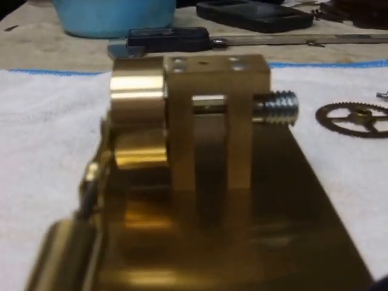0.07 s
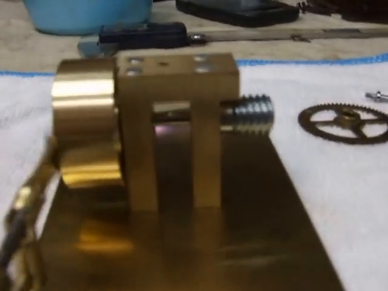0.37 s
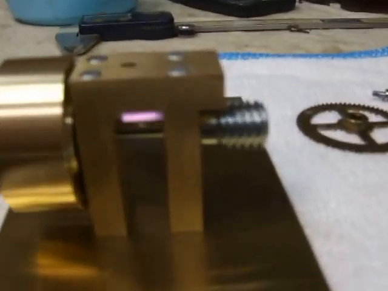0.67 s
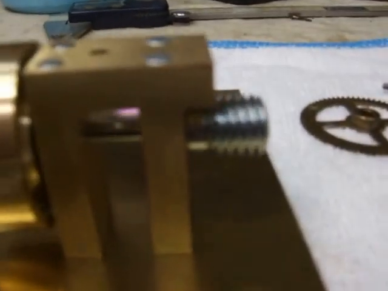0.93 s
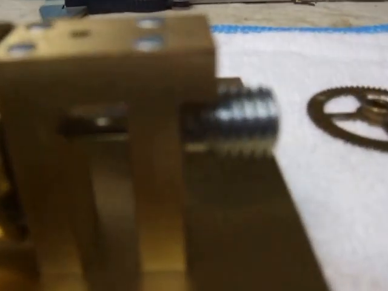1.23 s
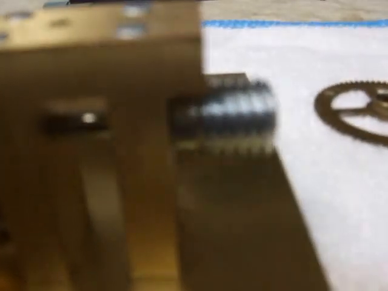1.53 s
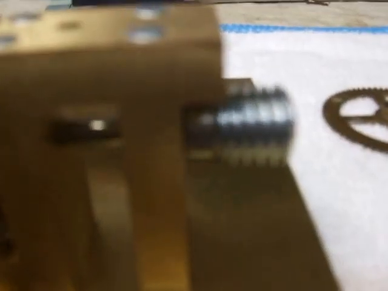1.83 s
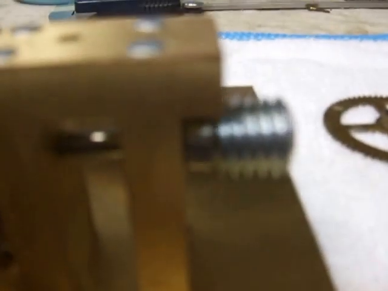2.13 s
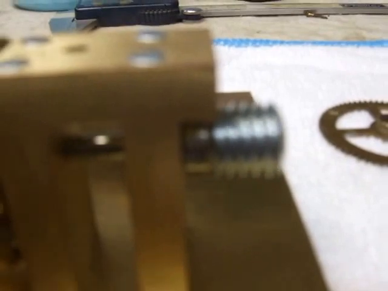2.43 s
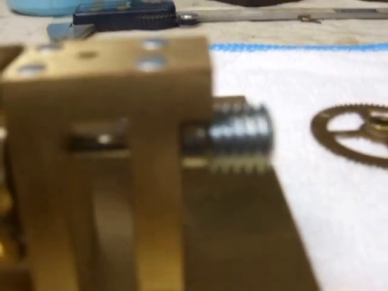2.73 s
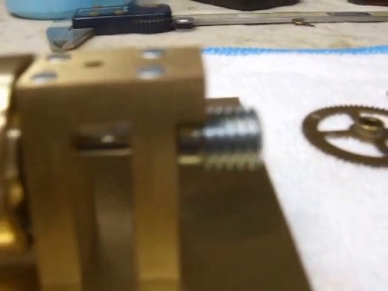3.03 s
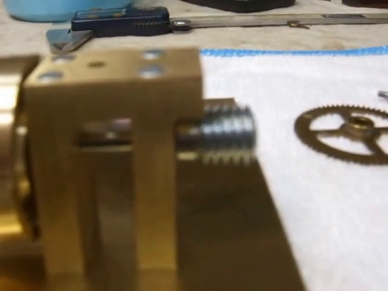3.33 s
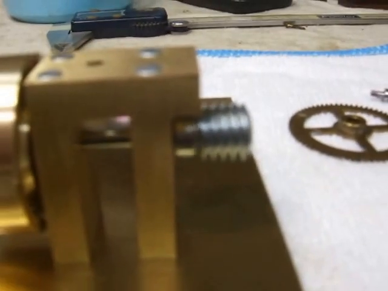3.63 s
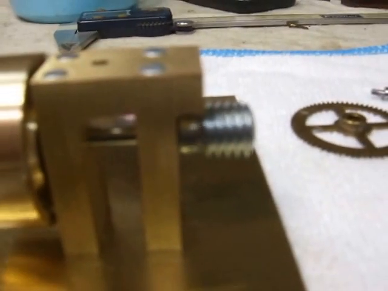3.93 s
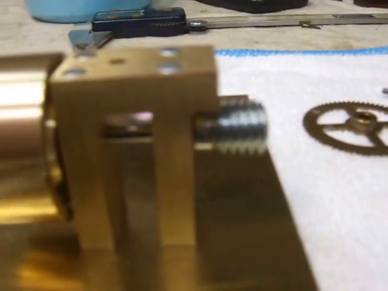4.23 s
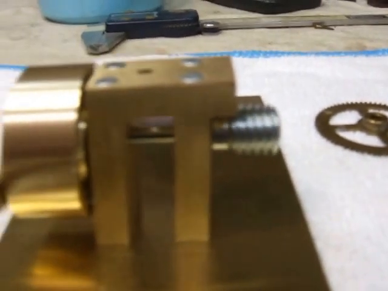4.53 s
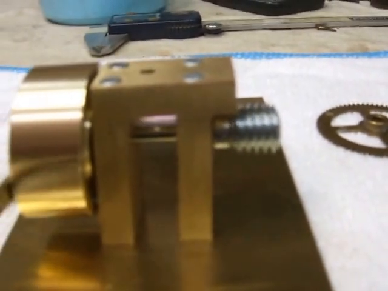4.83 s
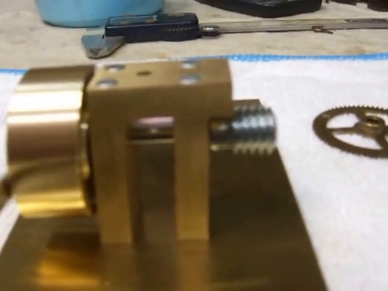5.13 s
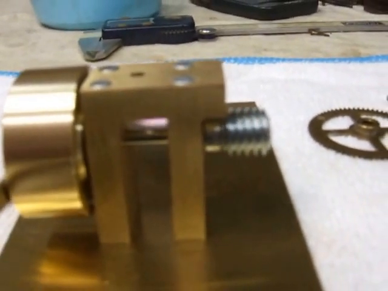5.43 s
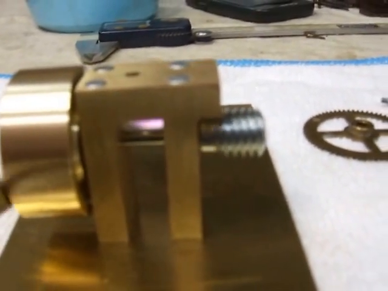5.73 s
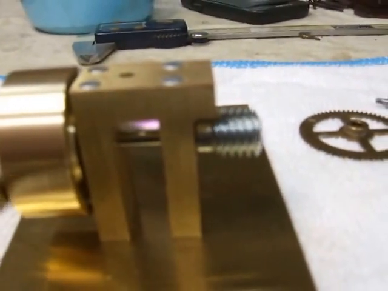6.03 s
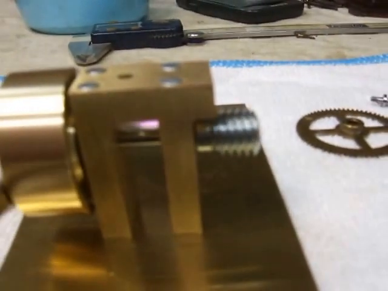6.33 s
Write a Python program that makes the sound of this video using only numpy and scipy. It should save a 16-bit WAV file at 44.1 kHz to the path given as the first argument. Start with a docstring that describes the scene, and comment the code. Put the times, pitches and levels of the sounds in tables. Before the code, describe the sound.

Rapid, even metallic clacking comes from a little brass engine driven by compressed air, running throughout. Each knock has a short rattling rebound, with occasional light clinks, soft puffs and a pulsing hiss of leaking air. Later the engine briefly slows twice, letting out more air, and recovers. It is heard from a close, slowly moving microphone in a fairly dry workshop with a faint rumble and hum.

```python
"""Small brass engine on compressed air, about 7 turns/s, heard close from a moving mic.
At both dead centres the slack rod knocks, then rebounds in a short chatter, ringing the brass
parts and the base plate. The port puffs softly and air leaks past the piston on every stroke.
Underneath: bearing rub, faint reflections, workshop rumble and hum."""
import sys
import numpy as np
from scipy import signal
from scipy.fft import rfft, irfft
from scipy.io import wavfile
from scipy.ndimage import uniform_filter1d

SR = 44100
rng = np.random.default_rng(int(sys.argv[2]) if len(sys.argv) > 2 else 0)


def log_audio(samples):
    """Write samples as a 16-bit WAV file to the path given in sys.argv[1]."""
    # one column per channel
    frames = np.atleast_2d(samples).T
    # limit to full scale, then quantise
    limited = np.clip(frames, -1, 1)
    pcm = np.round(limited * 32767).astype(np.int16)
    wavfile.write(sys.argv[1], SR, pcm)


N = 286209
TIME_S = np.arange(N) / SR
AGE_S = np.arange(SR // 8) / SR  # since a contact

# workshop rumble spectrum: f/Hz, level/dB
RUMBLE_SPECTRUM = [(15, 9.5), (35, -8), (60, -3.5), (90, -2), (140, -7), (250, -6), (500, -18.5),
                   (1500, -39)]
# shaft rubbing in its bearings: f/Hz, level/dB
RUB_SPECTRUM = [(50, -7), (110, 7), (250, -2.5), (420, -3), (850, 2), (1400, -1.5), (2400, -2.5),
                (5000, -17)]
# leaking air: f/Hz, level/dB
LEAK_SPECTRUM = [(300, -16), (900, -18), (2300, -13.5), (3400, -4), (4800, -3.5), (5800, -2.5), (6800, 2.5),
                 (7500, 3.5), (8300, -7)]
# mic path: t/s, nearness (0 back by the flywheel, 1 over the bearing block)
MIC_PATH = [(0, 0.6), (.5, 0.62), (1.2, 1), (2.4, 0.98), (3.2, 0.47), (4.2, 0.58), (4.8, 0.03),
            (6.49, 0.29)]
# cylinder beams treble at the mic at first: t/s, treble re middle/dB
TREBLE_BEAM = [(0, 4.5), (.5, 5), (1.3, 0.5)]
# flywheel speed, sagging twice as much air escapes: t/s, speed/(turns/s)
FLYWHEEL_SPEED = [(0.0, 6.208), (0.39, 6.805), (0.59, 6.602), (0.72, 7.0), (1.06, 6.725), (1.91, 7.28),
                  (2.13, 6.881), (2.55, 6.803), (2.91, 7.064), (3.03, 6.745), (3.18, 6.963), (4.4, 7.113),
                  (4.64, 6.675), (4.77, 5.86), (5.21, 6.84), (5.97, 7.016), (6.09, 6.384), (6.48, 6.924)]
# extra air past the port face: stroke end t/s, boost/dB
BLOW_BY_STROKES = [(1.155, 4.5), (2.295, 7), (4.589, 5), (4.744, 10), (5.94, 2.5), (6.087, 11)]
# cloth-damped base plate and block: f/Hz, level/dB (before 1/t60 weight), t60/s, near gain/dB
PLATE_MODES = [(569.5, -9, 0.044, 0), (822, -5.5, 0.017, 0), (926, -4.5, 0.021, -3.5),
               (1093, -6, 0.0096, -5.5), (1393.6, 5, 0.045, -2.5), (1805, -6, 0.032, 2.5),
               (2002, -6, 0.04, -5), (2507, -5, 0.071, -5.5)]
# rod, cylinder, flywheel: f/Hz, level/dB (before 1/t60 weight), t60/s, near gain/dB
BRASS_MODES = [(3055.5, -9, 0.045, 5), (3582, -18, .022, 2.5), (3781, -10, 0.049, 1),
               (4103, -11, 0.028, -3), (4630, 0, 0.072, -4.5), (4774, 1.5, .035, -17),
               (4920, -11.5, 0.019, 3.5), (5516, -20.5, 0.023, 8.5), (5640, -15, 0.014, 6),
               (5896, -6, 0.023, -11), (6420, -9.5, 0.053, -7), (7035, -1.5, 0.016, -7.5),
               (7604, 1.5, 0.023, -4.5)]
# dense, fast-dying plate vibration: f/Hz, level/dB
PLATE_CRACK_SPECTRUM = [(100, -9.5), (420, -20), (800, 5), (1200, 3), (2200, -15.5), (3500, -19.5)]
# dense, fast-dying brass vibration: f/Hz, level/dB
BRASS_CRACK_SPECTRUM = [(1500, -18), (2400, -13), (3200, -10.5), (4500, -4), (6000, -0.5), (7500, -4),
                        (8300, 12.5), (16000, -14.5)]
# square rebounds: t/s, f/Hz (picks the two nearest brass modes), level/dB
SQUARE_REBOUNDS = [(0.129, 5950, -26), (.272, 5950, -29.5), (.499, 5950, -30.5), (1.378, 5600, -28),
                   (2.809, 5580, -30), (3.525, 4580, -26.5), (3.673, 4736, -29.5), (5.146, 4736, -26.5),
                   (6.321, 4736, -29)]
# harder head-end knocks: t/s, boost/dB
HARD_HEAD_KNOCKS = [(.116, 1.5), (.27, 3.5), (.567, 1), (.715, 1), (1.155, 3.5), (1.3, 1.5), (2.588, 1.5),
                    (3.019, 4), (3.593, 2), (3.738, 1.8), (4.022, 3.5)]

START_TURNS, HEAD_END_TURNS, CRANK_END_TURNS = 0.2707, 0, 0.4635  # crank angles
KNOCK_FADE_DB_PER_S, REBOUND_FADE_DB_PER_S = -0.167, -0.3954
LEAK_FADE_DB_PER_S, PUFF_FADE_DB_PER_S = -1.14, -0.29
KNOCK_SCATTER_DB, REBOUND_SCATTER_DB, LEAK_SCATTER_DB = 1.0, 1.74, 0.6
PLATE_FAR_DB, PLATE_NEAR_GAIN_DB = -12.5, 5  # re brass


def undb(db):
    """dB to gain."""
    return 10 ** (np.asarray(db) / 20)


def unit(x, span_s=None):
    """Scale to rms 1, overall or over the opening span."""
    return x / np.sqrt(np.mean(x[:int(span_s * SR) if span_s else None] ** 2) + 1e-18)


def bin_gains(spectrum, size):
    """Gain per FFT bin, interpolated over log frequency."""
    hz, db = np.transpose(spectrum)
    bin_hz = np.fft.rfftfreq(size, 1 / SR)
    return undb(np.interp(np.log(bin_hz + 1), np.log(hz), db))


def noise(spectrum):
    """Steady coloured noise, rms 1."""
    return unit(irfft(rfft(rng.standard_normal(N)) * bin_gains(spectrum, N), N))


def nearness(t_s):
    """Mic nearness to the bearing block, 0-1."""
    return np.interp(t_s, *np.transpose(MIC_PATH))


def dead_centres(angle_turns):
    """Times/s at which the crank passes an angle."""
    speed = np.interp(TIME_S, *np.transpose(FLYWHEEL_SPEED))
    turns = START_TURNS + np.cumsum(speed) / SR - angle_turns
    return TIME_S[1:][np.diff(np.floor(turns)) > 0]


def boosts_db(times_s, table):
    """Boost per stroke; each row goes to the nearest stroke."""
    out = np.zeros(len(times_s))
    for t_s, db in table:
        out[np.argmin(np.abs(times_s - t_s))] += db
    return out


def add(out, t_s, sound):
    """Mix a sound in at t_s."""
    start = max(int(t_s * SR), 0)
    out[start:start + len(sound)] += sound[:max(N - start, 0)]


def workshop(hum_hz=89.4):
    """Low rumble, faint steady hum."""
    rumble = noise(RUMBLE_SPECTRUM)
    hum = unit(np.sin(2 * np.pi * (hum_hz * TIME_S + rng.random())))
    return undb(-49.5) * rumble + undb(-58.5) * hum


def reflections(x, wet_db, t60_s):
    """Direct sound plus a faint tail off bench and workshop."""
    t_s = np.arange(SR // 2) / SR
    tail = rng.standard_normal(len(t_s)) * np.exp(-np.log(1000) * t_s / t60_s) * (t_s > 0.004)
    return x + undb(wet_db) * signal.fftconvolve(x, tail / np.linalg.norm(tail))[:N]


def cylinder_beam(x, split_hz):
    """Treble up, middle down while the cylinder faces the mic."""
    treble = signal.sosfiltfilt(signal.butter(4, split_hz, "high", fs=SR, output="sos"), x)
    lift = undb(np.interp(TIME_S, *np.transpose(TREBLE_BEAM)) / 2)
    return treble * lift + (x - treble) / lift


def bearing_rub():
    """Shaft rub, louder near the block."""
    return undb(-51.0 + 9.2 * nearness(TIME_S)) * noise(RUB_SPECTRUM)


def piston_leak(head_db, crank_db, near_gain_db, sag_db, empty_share):
    """Hiss sags as the cylinder empties, swells as pressure returns, most towards the crank end."""
    head_s = dead_centres(HEAD_END_TURNS)
    ends_s = np.sort(np.concatenate([head_s, dead_centres(CRANK_END_TURNS)]))
    peak_db = np.where(np.isin(ends_s, head_s), head_db, crank_db)
    peak_db += LEAK_FADE_DB_PER_S * ends_s + near_gain_db * nearness(ends_s)
    peak_db += boosts_db(ends_s, BLOW_BY_STROKES) + LEAK_SCATTER_DB * rng.standard_normal(len(ends_s))
    hold_edges_s = np.ravel([ends_s - 0.025, ends_s + 0.011], order="F")
    held_db = np.interp(TIME_S, hold_edges_s, np.repeat(peak_db, 2))
    stroke_share = np.interp(TIME_S, ends_s, np.arange(len(ends_s))) % 1
    emptied = np.interp(stroke_share, [0, empty_share, 1], [0, 1, 0])
    return undb(held_db + sag_db * emptied) * noise(LEAK_SPECTRUM)


def port_puff(t_s, base_db, delay_s, width_s):
    """Port opens: pressure dips, swings up, settles."""
    jitter_s, scatter_db = rng.normal(0, [0.00044, 0.72])
    widths = (AGE_S - delay_s - jitter_s) / width_s
    level_db = base_db + PUFF_FADE_DB_PER_S * t_s + 3.8 * nearness(t_s) + scatter_db
    return undb(level_db) * np.exp(-widths ** 2 / 2) * np.sin(1.425 * widths + 0.7)


def ring(modes, near, scatter_db, detune):
    """Decaying modes; level and pitch shift slightly with the contact point."""
    hz, db, t60_s, near_gain_db = np.transpose(modes)[:, :, None]
    size, shift, phase = rng.standard_normal((3, len(modes), 1))
    waves = np.cos(2 * np.pi * hz * (1 + detune * shift) * AGE_S + phase)
    decay = np.exp(-np.log(1000) * AGE_S / t60_s)
    gain = undb(db + near * near_gain_db + scatter_db * size) / t60_s
    return np.sum(gain * waves * decay, axis=0)


def clinks():
    """A square rebound rings a close pair of brass modes."""
    out = np.zeros(N)
    for t_s, hz, db in SQUARE_REBOUNDS:
        pair = sorted(BRASS_MODES, key=lambda mode: abs(mode[0] - hz))[:2]
        ringing = ring(pair, nearness(t_s), scatter_db=0.5, detune=0.001)
        add(out, t_s, undb(db) * unit(ringing, span_s=0.029))
    return out


def crack(spectrum, size=512):
    """Dense, fast-dying vibration: minimum-phase pulse by folded cepstrum."""
    cepstrum = irfft(np.log(bin_gains(spectrum, size)))
    cepstrum[1:size // 2] *= 2
    cepstrum[size // 2 + 1:] = 0
    pulse = irfft(np.exp(rfft(cepstrum)))
    return np.pad(pulse, (0, len(AGE_S) - size))


def struck_part(force, modes, crack_spectrum, near, crack_db, detune):
    """Force drives a part's modes and crack; rms 1 over the attack."""
    ringing = ring(modes, near, scatter_db=1.52, detune=detune)
    response = unit(ringing) + undb(crack_db) * unit(crack(crack_spectrum))
    return unit(signal.fftconvolve(force, response)[:len(AGE_S)], span_s=0.009)


def contact(blow_db, rise_s, fall_s, spread_db):
    """Force of loose metal meeting: one blow, then a dying chatter of uneven micro-impacts."""
    impacts, size = rng.standard_normal((2, len(AGE_S)))
    envelope = (1 - np.exp(-AGE_S / rise_s)) * np.exp(-(AGE_S / fall_s) ** 1.16)
    chatter = impacts * undb(spread_db * size) * envelope
    blow = rng.standard_normal(len(AGE_S)) * np.exp(-AGE_S / 0.00035)
    return unit(chatter) + undb(blow_db) * unit(blow)


def whiten(force, span_hz):
    """Flatten a force's broad colour, so the parts clack alike on every turn."""
    size = 2 * len(force)
    spectrum = rfft(force, size)
    power = uniform_filter1d(np.abs(spectrum) ** 2, int(span_hz * size / SR))
    return irfft(spectrum / np.sqrt(np.abs(power) + 1e-18))[:len(force)]


def clack(t_s, force, brass_db, plate_rel_db):
    """One contact rings the bright brass and the duller plate."""
    force, near = whiten(force, span_hz=295), nearness(t_s)
    brass = struck_part(force, BRASS_MODES, BRASS_CRACK_SPECTRUM, near, crack_db=-10.5, detune=0.0019)
    plate = struck_part(force, PLATE_MODES, PLATE_CRACK_SPECTRUM, near, crack_db=-5, detune=0.0042)
    return undb(brass_db) * (brass + undb(plate_rel_db) * plate)


def pin_tick(db, hz, rise_s):
    """Pin meets bearing: a bright tick, a few cycles long."""
    envelope = (AGE_S / rise_s) ** 2 * np.exp(2 * (1 - AGE_S / rise_s))
    pitch_hz = hz * rng.normal(1, 0.038)
    return undb(db) * envelope * np.sin(2 * np.pi * (pitch_hz * AGE_S + rng.random()))


def strokes(times_s, knock_base_db, rebound_base_db):
    """Fading, scattered rod impacts: t/s, knock/dB, rebound/dB, plate re brass/dB."""
    knock, rebound = rng.standard_normal((len(times_s), 2)).T
    knock_db = knock_base_db + KNOCK_FADE_DB_PER_S * times_s + KNOCK_SCATTER_DB * knock
    rebound_db = rebound_base_db + REBOUND_FADE_DB_PER_S * times_s + REBOUND_SCATTER_DB * rebound
    plate_rel_db = PLATE_FAR_DB + PLATE_NEAR_GAIN_DB * nearness(times_s)
    return np.transpose([times_s, knock_db, rebound_db, plate_rel_db])


def crank_end_knocks(plate_trim_db=-1.33):
    """Short scraping knock, gap as the rod crosses its slack, stronger rebound; one puff."""
    out = np.zeros(N)
    rows = strokes(dead_centres(CRANK_END_TURNS), knock_base_db=-23.0, rebound_base_db=-21.0)
    for t_s, knock_db, rebound_db, plate_rel_db in rows:
        knock = contact(blow_db=-6, rise_s=0.0006, fall_s=0.0033, spread_db=5)
        add(out, t_s, clack(t_s, knock, knock_db, plate_rel_db + plate_trim_db))
        rebound_s = t_s + rng.normal(0.0098, 0.0005)
        chatter_s = 0.0065 * rng.lognormal(sigma=0.49)
        rebound = contact(blow_db=-6, rise_s=0.0006, fall_s=chatter_s, spread_db=6)
        add(out, rebound_s, clack(rebound_s, rebound, rebound_db, plate_rel_db + plate_trim_db))
        add(out, t_s, port_puff(t_s, base_db=-27.1, delay_s=0.004, width_s=0.0013))
    return out


def head_end_knocks():
    """Hard knock with a tick; the rod crosses its slack and chatters on the far side; one puff."""
    out, times_s = np.zeros(N), dead_centres(HEAD_END_TURNS)
    rows = strokes(times_s, knock_base_db=-22.5, rebound_base_db=-22.5)
    hard_boosts_db = boosts_db(times_s, HARD_HEAD_KNOCKS)
    for (t_s, knock_db, rebound_db, plate_rel_db), hard_db in zip(rows, hard_boosts_db):
        brass_db = knock_db + hard_db
        add(out, t_s, pin_tick(db=brass_db + 9.5 + 3.6 * nearness(t_s), hz=7390, rise_s=0.0006))
        knock = contact(blow_db=-1.0, rise_s=0.00033, fall_s=0.006, spread_db=7)
        add(out, t_s, clack(t_s, knock, brass_db, plate_rel_db + 2.6 - hard_db))  # boost skips the plate
        rebound_s = t_s + rng.normal(0.0113, 0.0007)
        rebound = contact(blow_db=-7.5, rise_s=0.00096, fall_s=0.0037, spread_db=6.5)
        add(out, rebound_s, clack(t_s, rebound, rebound_db, plate_rel_db))
        add(out, t_s, port_puff(t_s, base_db=-29.5, delay_s=0.0042, width_s=0.0012))
    return out


def scene():
    """Knocks, clinks, leak and rub over the workshop; mono."""
    rub = bearing_rub()
    leak = piston_leak(head_db=-37.0, crank_db=-29.0, near_gain_db=3.1, sag_db=-7.5, empty_share=0.25)
    engine = head_end_knocks() + crank_end_knocks() + clinks() + leak + rub
    beamed = cylinder_beam(engine, split_hz=4960)
    return (reflections(beamed, wet_db=-17.0, t60_s=0.4) + workshop())[None]


def record(dry):
    """Steep elliptic low-pass."""
    cutoff_hz = 8150
    return signal.sosfilt(signal.ellip(8, 0.3, 51, cutoff_hz, fs=SR, output="sos"), dry)


dry = scene()
out = record(dry)
log_audio(out)
```